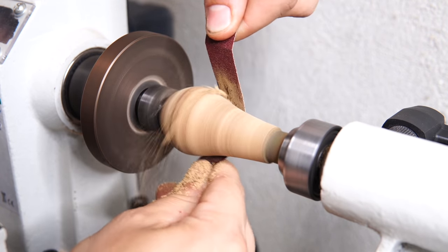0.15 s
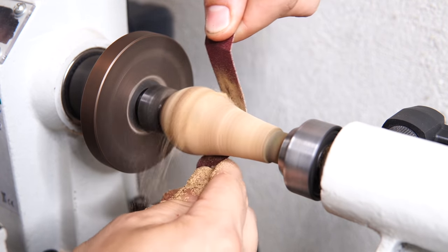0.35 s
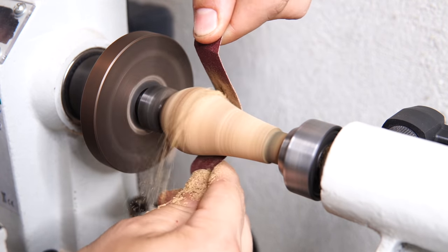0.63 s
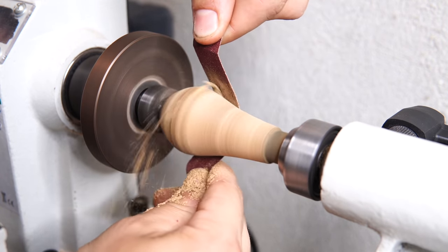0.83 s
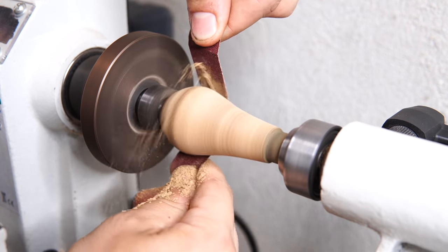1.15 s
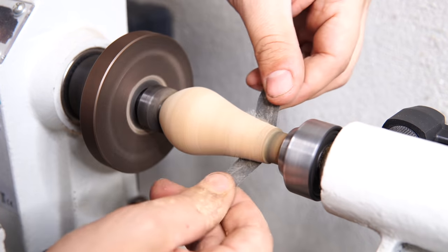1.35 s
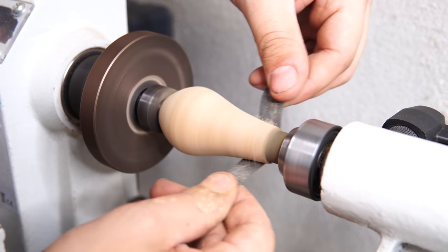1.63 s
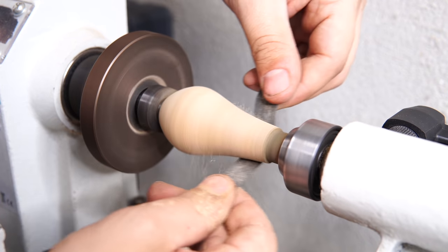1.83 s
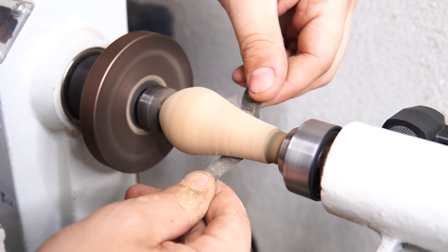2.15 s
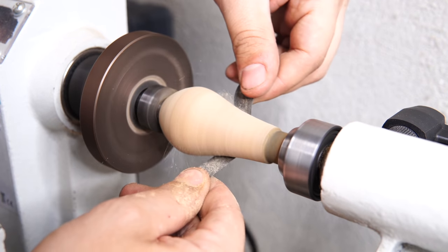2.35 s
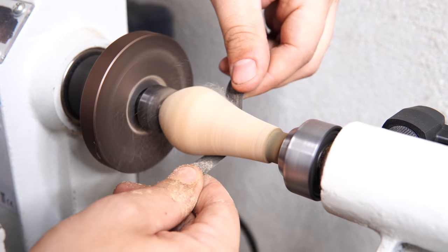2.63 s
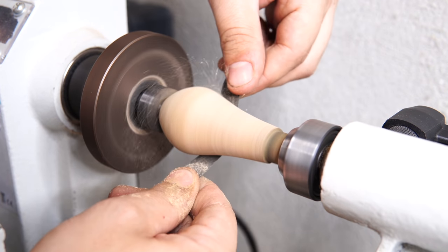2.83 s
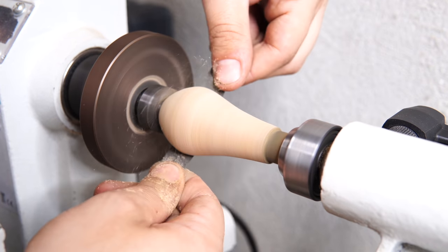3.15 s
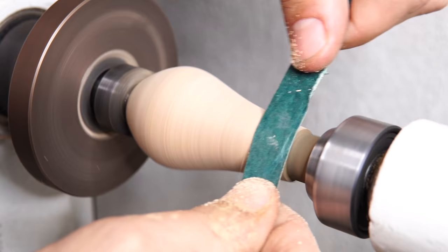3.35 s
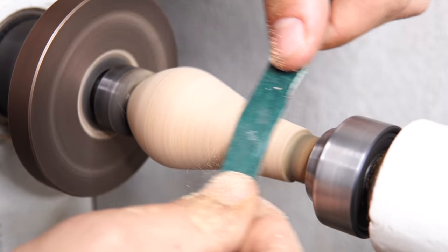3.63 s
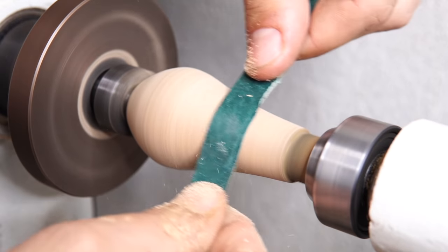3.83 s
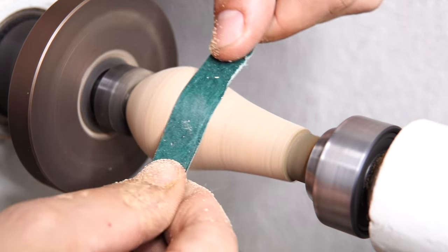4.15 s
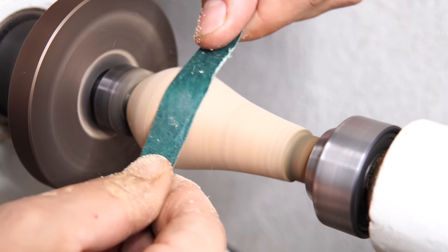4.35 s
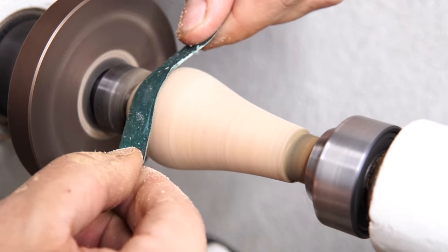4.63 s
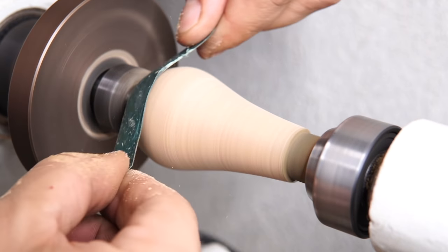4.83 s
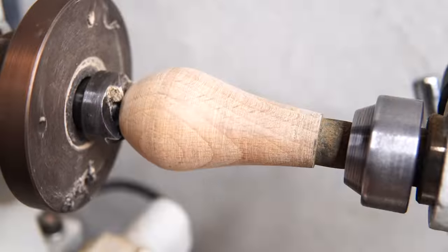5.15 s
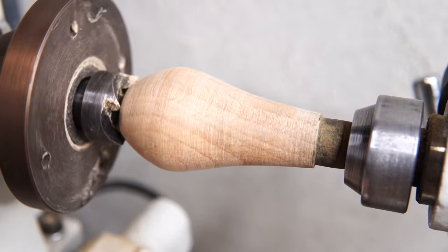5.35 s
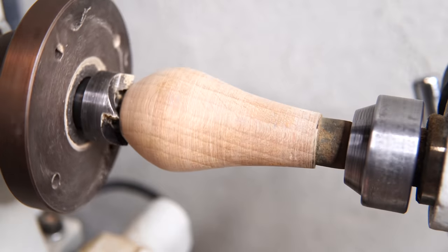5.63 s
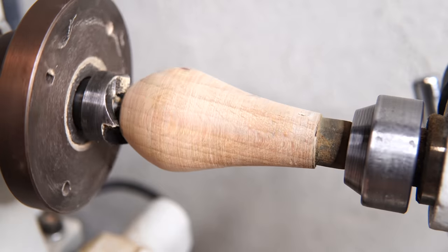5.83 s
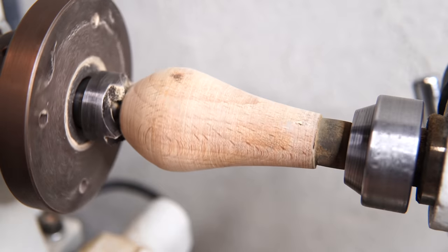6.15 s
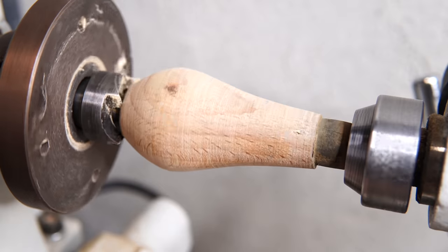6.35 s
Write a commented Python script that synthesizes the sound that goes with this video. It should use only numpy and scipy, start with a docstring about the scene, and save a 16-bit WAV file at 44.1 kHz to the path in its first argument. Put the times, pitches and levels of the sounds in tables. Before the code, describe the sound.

A small wood lathe runs close and centred, its motor humming low with wavering whirs and frame rumble. A coarse cloth strip hisses brightly over the spinning wooden handle, then open mesh sands with low rising rasps, then fine cloth scrapes more softly. An abrupt cut leaves a quiet workshop with dull room noise and a barely audible drone.

```python
"""A small wood lathe, close and centred, spins a handle while three sanding strips are held to it in turn.
The motor hums on the mains buzz, the shafts whir as wavering tones, and coloured noise rumbles in the frame.
Grit is hiss mixed with ticks, fluttering with each turn; pulls on the open mesh add a low, rising rasp.
The sound cuts from coarse cloth to mesh to fine cloth, and at last to the quiet workshop, wide and dull,
with the lathe at rest and a faint drone."""
import sys
import numpy as np
from scipy import signal
from scipy.fft import rfft, irfft
from scipy.io import wavfile
from scipy.ndimage import uniform_filter1d

SR = 44100
rng = np.random.default_rng(int(sys.argv[2]) if len(sys.argv) > 2 else 0)


def wav_record(signal):
    """Record a signal, one row per channel, as 16-bit PCM in the file named by sys.argv[1]."""
    frames = np.transpose(np.atleast_2d(signal))
    bounded = np.clip(frames, -1, 1)
    # unit amplitude maps onto the largest positive 16-bit level
    quanta = np.round(bounded * 32767).astype(np.int16)
    wavfile.write(sys.argv[1], SR, quanta)


N = 286650
TIME = np.arange(N) / SR
FREQS = np.fft.rfftfreq(N, 1 / SR)

# when the coarse, mesh and fine strips begin, and when the lathe is heard no more: [start_s]
CUTS = [0, 1.3065, 3.3875, 5.0672]
SPINDLE_HZ = 23.74  # turns per second


def amp(db):
    """Turns decibels into a gain."""
    return 10 ** (np.asarray(db) / 20)


def evened(x):
    """Scales to rms 1."""
    return x / np.sqrt(np.mean(x ** 2) + 1e-20)


def read(points, hz):
    """Reads a curve between its points, on a log-frequency axis."""
    f, value = np.transpose(points)
    return np.interp(np.log(hz + 1), np.log(f), value)


def bell(x, centre, width):
    """A bump of height 1 and the given width at half height."""
    return 2 ** -((2 * (x - centre) / width) ** 2)


def lifts(modes, hz):
    """The dB by which a set of resonances and hollows shifts each frequency."""
    return sum(db * bell(hz, f, width) for f, width, db in modes)


def filtered(x, gain):
    """Weights the spectrum of x by a gain at each frequency."""
    return irfft(rfft(x) * gain, N)


def noise(spectrum):
    """Steady noise of a given colour, at rms 1."""
    return evened(filtered(rng.standard_normal(N), amp(read(spectrum, FREQS))))


def drift(hz):
    """Slow random wander at rms 1, mostly below hz."""
    return evened(filtered(rng.standard_normal(N), bell(FREQS, 0, 2 * hz)))


def resonate(x, hz, width):
    """A steep two-pole resonance that follows the curve hz, at rms 1; width (Hz) is that of each pole."""
    turn = np.exp(2j * np.pi * np.cumsum(hz) / SR)
    r = np.exp(-np.pi * width / SR)
    # shift the pitch down to 0 Hz, filter there, then shift back up
    low = signal.lfilter([1], [1, -2 * r, r * r], x / turn)
    return evened((turn * low).real)


def during(start, end):
    return (TIME >= start) & (TIME < end)


def once_a_turn(depth_db, overtone_db):
    """The wood's grain and slight wobble press once and twice each turn, swaying the level."""
    angle = 2 * np.pi * (SPINDLE_HZ * TIME + rng.random()) + 0.15 * drift(2.6)
    twice = np.sin(2 * angle + 2 * np.pi * rng.random())
    return amp(depth_db * np.sin(angle) + overtone_db * twice)


def hum(buzz_hz=100, skip_turns=0.272):
    """Magnetic buzz locked to the mains; its phase steps at the cut to the fine strip, a soft bump."""
    # magnetic hum of the motor, before the lathe's own gain: [multiple of buzz_hz, level_db]
    partials = [(1, -23), (2, -32), (3, -44.5), (5, -59), (6, -56.5)]
    turns = buzz_hz * TIME + skip_turns * (TIME < CUTS[2])
    return -np.sqrt(2) * sum(amp(db) * np.sin(2 * np.pi * round(k) * turns) for k, db in partials)


def whir(rotor_hz=24.687, sway_s=0.00017, waver_db=1.6, swell_db=2.0, swell_peak_s=1.55, swell_period_s=0.573):
    """Shaft, belt and slot tones sway together in pitch; the slot whine swells and fades slowly."""
    # spindle tones, before the lathe's own gain: [multiple of SPINDLE_HZ, level_db]
    spindle_tones = [(2, -69), (3, -43), (6, -60), (10, -45.5), (12, -89), (24, -55.5), (30, -55.5),
                     (31, -60.5)]
    # rotor tones: [multiple of rotor_hz, level_db]
    rotor_tones = [(1, -59.5), (10, -47.5)]
    # whine of the rotor slots: [multiple of rotor_hz, coarse_load_db, light_load_db]
    slots = [(41, -57, -48), (42, -48.5, -52.5), (43, -55.5, -56.5)]
    # belt and bearing tones: [pitch_hz, level_db]
    bearings = [(196.5, -45.5), (242.1, -47), (244.6, -50.5), (275.4, -57), (293.6, -54.5), (324.5, -53),
                (575.2, -62.5), (656, -59.5), (812.2, -63), (836.8, -54.5)]
    clock = TIME + sway_s * drift(1.74)

    def tone(hz, db):
        """One sine whose level wavers by itself."""
        level = amp(db + waver_db * drift(2.7))
        return np.sqrt(2) * level * np.sin(2 * np.pi * (hz * clock + rng.random()))

    spindle = sum(tone(round(k) * SPINDLE_HZ, db) for k, db in spindle_tones)
    rotor = sum(tone(round(k) * rotor_hz, db) for k, db in rotor_tones)
    whine = sum(tone(round(k) * rotor_hz, np.where(TIME < CUTS[1], loaded, light))
                for k, loaded, light in slots)
    swell = amp(swell_db * np.cos(2 * np.pi * (TIME - swell_peak_s) / swell_period_s))
    belt = sum(tone(hz, db) for hz, db in bearings)
    return spindle + rotor + swell * whine + belt


def frame_rumble(gain_db=-37.5):
    """Broad noise of the running machine rings in the iron frame and flutters with each turn."""
    # colour of the rumble: [frequency_hz, relative density_db]
    colour = [(20, -14), (60, 3), (130, -1), (250, 6), (350, 1), (430, -4), (590, -2), (770, -6.5),
              (860, -3.5), (1050, -3), (1500, -8.5), (1850, -11.5), (2020, -9.5), (2350, -10), (4000, -10),
              (16000, -21)]
    # resonances and hollows of the iron frame: [centre_hz, width_hz, lift_db]
    frame = [(1856, 65, 10), (1970, 140, -6.5), (2837, 110, 7.5), (3150, 120, 8), (4060, 200, -7.5),
             (4400, 250, -5), (4880, 110, 10.5), (5550, 250, -7), (6070, 230, 6.5)]
    ringing = filtered(noise(colour), amp(lifts(frame, FREQS)))
    return amp(gain_db) * ringing * once_a_turn(depth_db=1.0, overtone_db=1.45)


def lathe(first_hum_db=-8.6, first_drive_db=-7.0):
    """Sums hum, whir and rumble; the machine is softer under the coarse strip and silent after the fine."""
    first, later = during(CUTS[0], CUTS[1]), during(CUTS[1], CUTS[3])
    hum_gain = amp(first_hum_db) * first + later
    drive_gain = amp(first_drive_db) * first + later
    return hum_gain * hum() + drive_gain * (whir() + frame_rumble())


def grit(per_s, spread_db, share):
    """Countless tiny scratches merge to hiss; sparse ticks of varied size hold a share of the power."""
    size = amp(spread_db * np.minimum(rng.exponential(1, N), 3))
    ticks = rng.choice([-1, 1], N) * size * (rng.random(N) < per_s / SR)
    return np.sqrt(share) * evened(ticks) + np.sqrt(1 - share) * rng.standard_normal(N)


def strip(index, colour, modes, scratches, ring, patchy_db, level_db, bite_share, fizz_share, damping=0.028):
    """Strip and mount colour the scratches; the pressure of the hands sets their force and brightness."""
    # how hard the hands press, one curve a strip, before level_db: [time_s, pressure_db]
    pressure = [
        [(0.01, -18.5), (0.21, -20.5), (0.71, -21), (1.02, -28), (1.29, -27)],
        [(1.32, -25), (1.7, -26), (2.42, -29), (2.67, -24.5), (2.98, -29.5), (3.37, -28.5)],
        [(3.4, -28), (3.71, -29), (4.33, -26), (4.55, -29), (4.61, -33.5), (5.05, -36)],
    ]
    # the strip tilts and its edge fizzes: [centre_s, length_s, lift_db]
    fizzes = [(1.04, .16, 4.5), (1.22, 0.08, 2), (1.98, 0.046, 5), (3.246, .19, 8.5), (4.24, 0.21, 3.5),
              (4.56, 0.091, 7)]
    # the strip catches and sings briefly: [centre_s, length_s, pitch_hz, lift_db]
    catches = [(.54, 0.49, 4100, 5), (1.153, 0.12, 3680, 6.5), (1.288, 0.054, 3450, 9),
               (1.263, 0.06, 12100, 8), (1.423, 0.21, 4370, 7), (1.858, 0.35, 4200, 5),
               (2.3, 0.27, 4430, 7.5), (2.35, 0.35, 6400, 4.5), (2.708, 0.27, 6400, 4.5),
               (3.02, 0.21, 8040, 5.5), (3.22, .22, 4230, 4.5), (3.468, 0.18, 4050, 9.5)]
    catch_width = 0.28  # share of the pitch
    s, pressure_db = np.transpose(pressure[index])
    hz, t, z = signal.stft(scratches, SR, nperseg=512, noverlap=384)
    hz = hz[:, None]
    push_db = np.interp(t, s, pressure_db) - pressure_db.mean()

    # a lighter touch damps the wood less, so its resonances stand out more
    ringing = ring + damping * np.maximum(-push_db, 0)
    field = read(colour, hz) + ringing * lifts(modes, hz)
    field -= 10 * np.log10(np.mean(amp(field) ** 2))

    # the larger grit bites low and the finest fizzes high; each follows the pressure by its own share
    bite = bell(hz, centre=3100, width=5700)
    fizz = bell(hz, centre=14900, width=4200)
    field += push_db * (1 + (bite_share - 1) * bite + (fizz_share - 1) * fizz)
    field += fizz * sum(db * bell(t, at, length) for at, length, db in fizzes)
    field += sum(db * bell(t, at, length) * bell(hz, f, catch_width * f) for at, length, f, db in catches)

    # the patch of contact keeps shifting, so the colour shimmers, fully from 6 kHz up
    shimmer_db = patchy_db * np.minimum(hz / 6000, 1)
    patches = uniform_filter1d(rng.standard_normal(z.shape), size=3, axis=0)
    patches = uniform_filter1d(patches, size=30, axis=1)
    shaped = z * amp(field + shimmer_db * evened(patches))
    scrape = signal.istft(shaped, SR, nperseg=512, noverlap=384)[1][:N]
    return amp(level_db + pressure_db.mean()) * scrape * during(CUTS[index], CUTS[index + 1])


def sanding():
    """Coarse cloth, open mesh, then fine cloth scratch the turning handle."""
    # scrape colour of each strip: [frequency_hz, relative density_db]
    coarse_colour, mesh_colour, fine_colour = [(600, -51), (1400, -29), (1800, -17.5), (2300, -21),
                                               (2750, -9), (3600, -13.5), (4400, -12.5), (6200, -4.5),
                                               (8000, -3), (11000, -5), (12000, -1), (14800, 0),
                                               (16000, -4.5)], [(600, -21), (1300, -18), (1700, -11),
                                                               (2030, -17.5), (2400, -10), (3400, -9),
                                                               (4400, -8.5), (5400, -6.5), (6400, -2.5),
                                                               (8000, -3), (11000, 1.3), (13000, 1.6),
                                                               (16000, 0.54)], [(600, -37), (1400, -13),
                                                                             (2030, -20), (2450, -10),
                                                                             (3400, -13.5), (4600, -12),
                                                                             (5500, -11), (6800, -6),
                                                                             (9000, -5), (11000, -2.5),
                                                                             (12500, -1.5), (14500, 1),
                                                                             (16000, -2.5)]
    # resonances and hollows of the handle and its mount, before ring: [centre_hz, width_hz, lift_db]
    mount = [(1910, 200, 1.5), (2030, 270, -8), (2854, 190, 6), (3560, 240, -3), (3920, 140, 3),
             (4120, 310, -2.5), (4750, 290, 2.5), (5390, 110, -4.5), (6320, 450, 0), (7100, 200, -7.5),
             (7180, 200, 3), (7560, 410, 2), (8230, 250, -1.5), (8200, 320, 1), (8800, 230, 4),
             (10240, 300, -5), (11100, 320, -7.5), (13000, 130, 1)]
    # the own ring of the coarse and the fine strip, before ring: [centre_hz, width_hz, lift_db]
    coarse_ring, fine_ring = [(7030, 440, 0), (7860, 250, 1.5), (8120, 300, -4), (8500, 230, 2.5),
                              (9000, 230, -9.5), (9900, 250, 0.5), (11100, 300, 4.5), (15000, 400, 2.5)], [(2930, 180, 6), (3220, 180, 2), (3580, 200, 3),
                                                   (4900, 160, -15), (6900, 250, 5.5), (8260, 220, 5),
                                                   (8550, 280, -2), (8800, 620, 4), (9900, 300, 5.5),
                                                   (14100, 300, -4)]
    coarse = grit(per_s=3000, spread_db=-1.0, share=0.24) * once_a_turn(depth_db=0.78, overtone_db=0.0)
    mesh = grit(per_s=2800, spread_db=3.5, share=0.34) * once_a_turn(depth_db=0.96, overtone_db=-0.2)
    fine = grit(per_s=3000, spread_db=1.0, share=0.23) * once_a_turn(depth_db=0.5, overtone_db=0.5)
    coarse_scrape = strip(
        index=0, colour=coarse_colour, modes=mount + coarse_ring, scratches=coarse,
        ring=0.86, patchy_db=2.2, level_db=4.5, bite_share=0.28, fizz_share=0.45)
    mesh_scrape = strip(
        index=1, colour=mesh_colour, modes=mount, scratches=mesh,
        ring=0.4, patchy_db=2.0, level_db=5.0, bite_share=0.25, fizz_share=1.8)
    fine_scrape = strip(
        index=2, colour=fine_colour, modes=mount + fine_ring, scratches=fine,
        ring=0.65, patchy_db=2.95, level_db=4.5, bite_share=0.52, fizz_share=0.57)
    return coarse_scrape + mesh_scrape + fine_scrape


def rasp(width=330, gain_db=-3):
    """The stretched mesh rings low: faintly while slack, louder and rising in pitch at each pull."""
    # each pull on the mesh, level before gain_db: [start_s, length_s, level_db, pitch_hz]
    pulls = [(1.296, 0.043, -40, 1130), (1.56, .18, -42.5, 1250), (1.928, 0.17, -37.5, 1150),
             (2.357, 0.46, -38.5, 1290), (3.14, .25, -40.5, 1260)]
    slack_db, slack_hz = -44.5, 1240  # level before gain_db
    attack_s, release_s, sag_db_per_s, climb_hz_per_s = 0.016, 0.058, 4, 260
    ringing = amp(slack_db) * resonate(rng.standard_normal(N), np.full(N, slack_hz), width)
    for start, length, db, hz in pulls:
        age = TIME - start
        held = np.clip(age, 0, length)
        envelope = np.clip(age / attack_s, 0, 1) * np.exp(-np.maximum(age - length, 0) / release_s)
        # the pitch climbs as the mesh tightens, passing hz halfway through the pull
        pitch = hz + climb_hz_per_s * (held - length / 2)
        level = amp(db - sag_db_per_s * held)
        ringing += level * envelope * resonate(rng.standard_normal(N), pitch, width)
    flutter = once_a_turn(depth_db=0.5, overtone_db=0.0)
    return amp(gain_db) * ringing * flutter * during(CUTS[1], CUTS[2])


def workshop(room_db=-51, drone_width=28):
    """Dull room noise and a faint drone reach both channels alike; each channel has its own thin hiss."""
    # colour of the still workshop: [frequency_hz, relative density_db]
    room = [(20, -2.5), (45, 2), (220, 0), (290, -1), (335, -12), (380, -1), (500, -9.5), (950, -11),
            (1500, -18), (2000, -22.5), (3000, -24.5), (15500, -25)]
    # faint drone: [time_s, pitch_hz, level_db]
    drone_path = [(5.07, 425, -69), (5.4, 420, -61), (5.8, 420, -76), (6.15, 456, -63), (6.5, 435, -58)]
    # likeness of the room noise in the two channels: [frequency_hz, coherence]
    likeness = [(60, .95), (200, .99), (640, .96), (1400, .82), (3100, .12), (6000, 0)]
    s, hz, db = np.transpose(drone_path)
    drone = resonate(rng.standard_normal(N), np.interp(TIME, s, hz), drone_width)
    drone = drone * amp(np.interp(TIME, s, db))
    same = np.clip(read(likeness, FREQS), 0, 1)
    mid = noise(room)
    # the less alike the channels, the stronger the part of opposite sign
    side = filtered(noise(room), np.sqrt((1 - same) / (1 + same)))
    return (amp(room_db) * np.array([mid + side, mid - side]) + drone) * (TIME >= CUTS[3])


def scene():
    """The close lathe sits in the centre; the still workshop follows."""
    return lathe() + sanding() + rasp() + workshop()


def record(dry, edge_hz=15850):
    """The recorder's band limit, a steep low-pass."""
    lowpass = signal.firwin(801, edge_hz, window=("kaiser", 9), fs=SR)
    return signal.oaconvolve(dry, lowpass[None], "same", axes=1)


dry = scene()
out = record(dry)
wav_record(out)
```